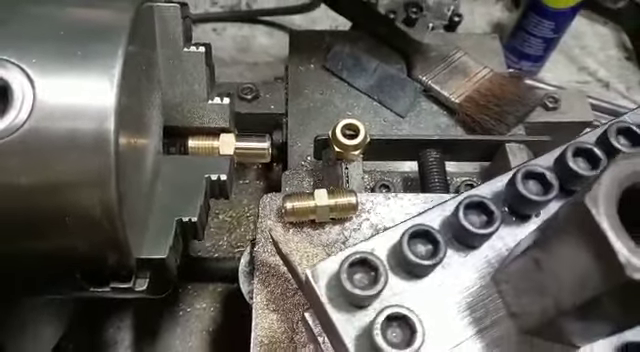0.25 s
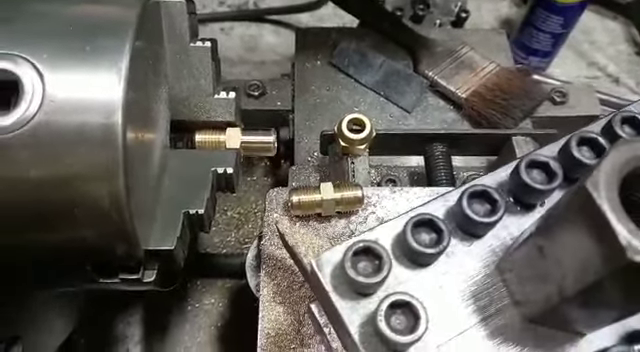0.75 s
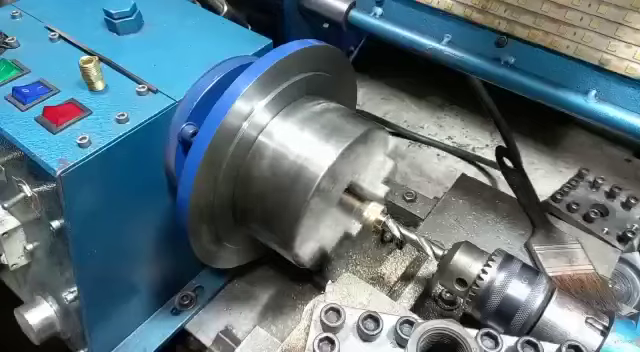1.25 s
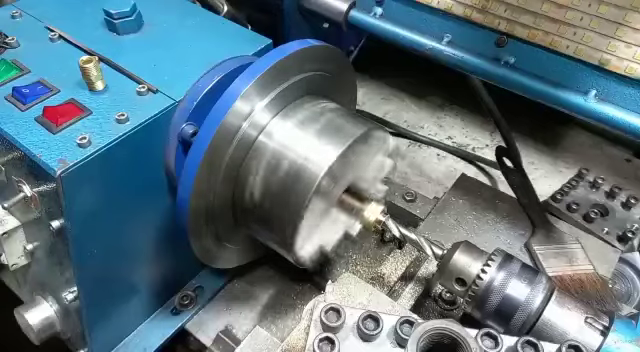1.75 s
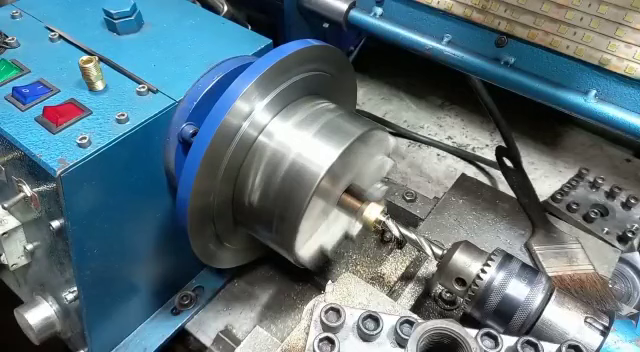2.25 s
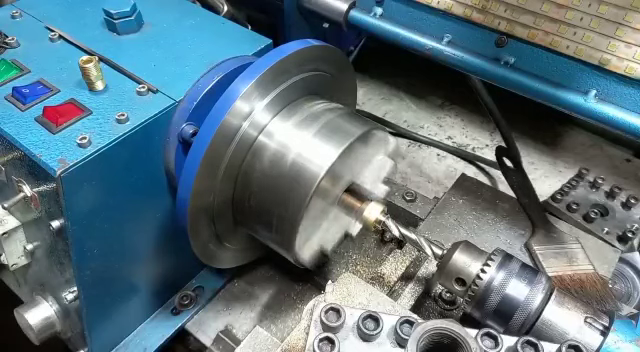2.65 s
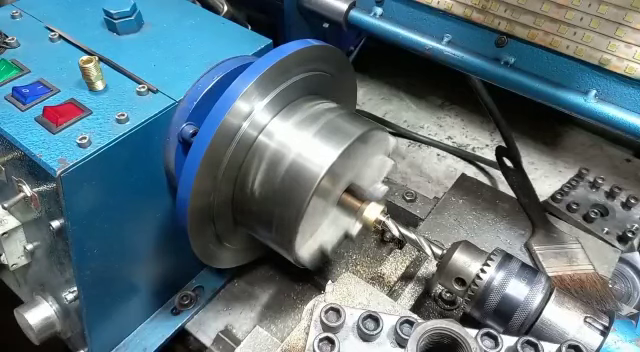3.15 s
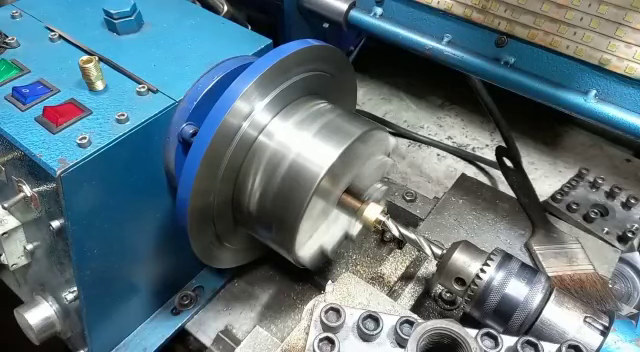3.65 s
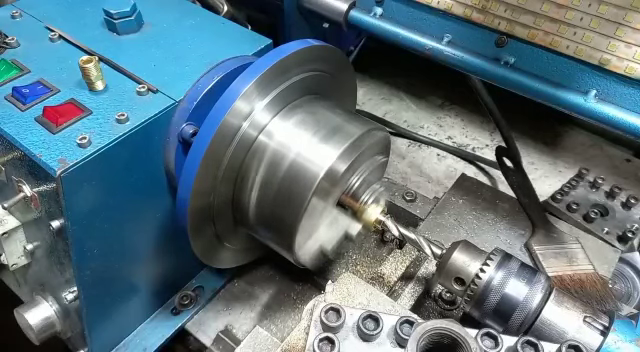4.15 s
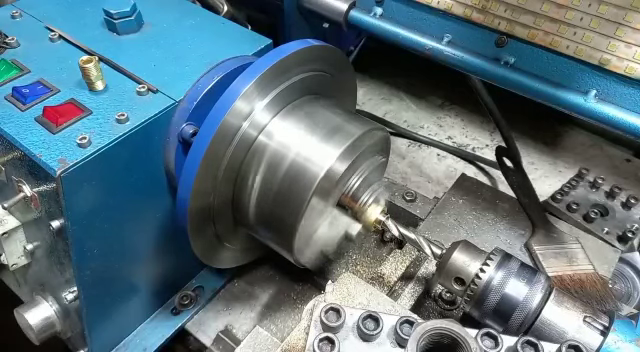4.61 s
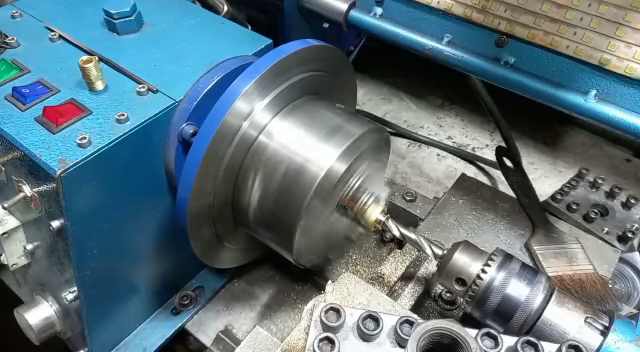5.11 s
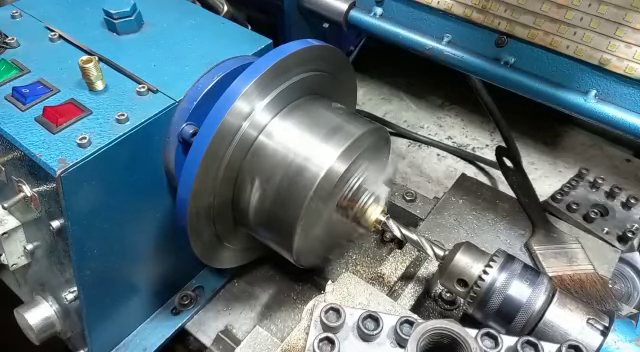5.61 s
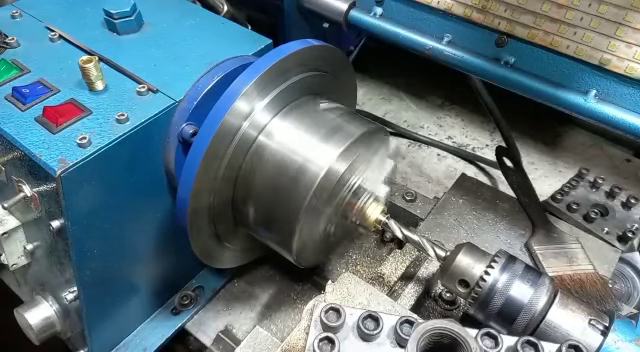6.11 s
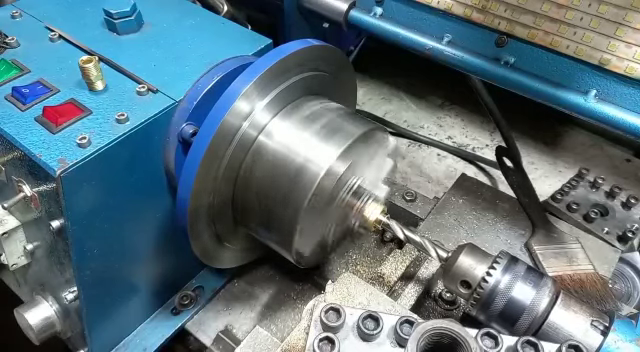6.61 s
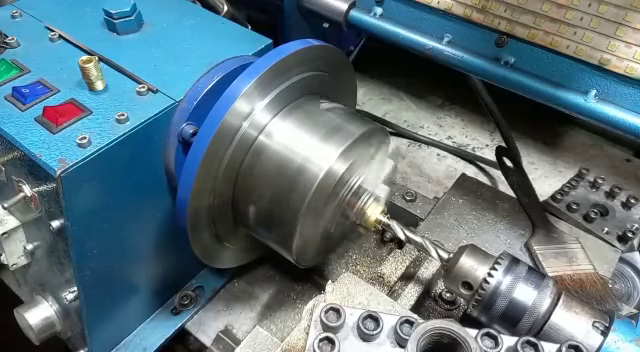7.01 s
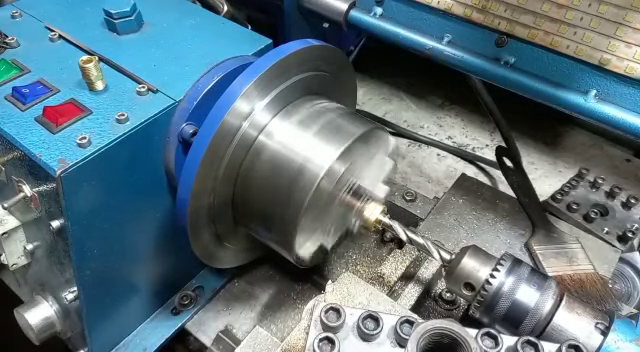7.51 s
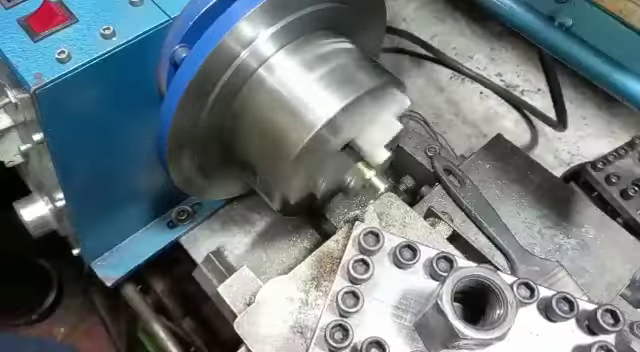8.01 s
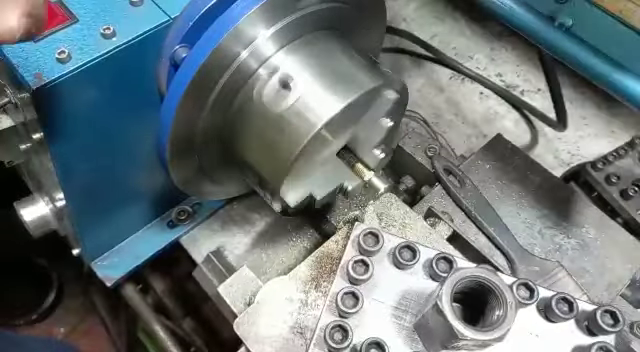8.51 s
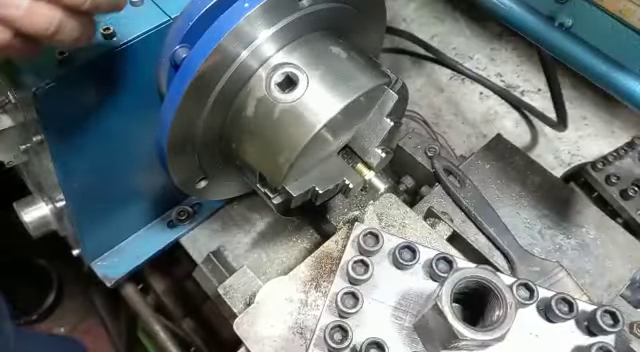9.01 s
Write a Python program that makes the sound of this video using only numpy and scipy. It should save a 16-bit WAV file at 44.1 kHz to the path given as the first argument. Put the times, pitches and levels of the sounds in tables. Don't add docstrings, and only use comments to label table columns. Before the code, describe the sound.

A quiet workshop with humming fan, faint room hiss, a small switch click and a dull far knock. After a tiny gap, close stereo microphones catch a drill boring spinning brass: rough, high metallic chatter, pulsing chip hiss and bright pings. It locks into a broken squeal, then loosens into soft rubbing with air thumps, mostly on the right. Finally the spindle whirs down, with thin brake squeaks and lever clicks.

```python
import sys
import numpy as np
from scipy import signal
from scipy.fft import rfft, irfft, next_fast_len
from scipy.io import wavfile
from scipy.ndimage import uniform_filter1d, map_coordinates

SR = 44100
rng = np.random.default_rng(int(sys.argv[2]) if len(sys.argv) > 2 else 0)


def int16_out(signal):
    q = np.round(np.clip(np.atleast_2d(signal).T, -1, 1) * 32767)
    wavfile.write(sys.argv[1], SR, q.astype(np.int16))


def invert_db(x):
    u = np.asarray(x, float) / 20
    return 10 ** u


N = 408321
TIME = np.arange(N) / SR
HALF = np.array([[.5], [-.5]])

# (from [s], to [s], fade-in [s])
SHOTS = [
    (0, 1.012, .001),
    (1.0905, 7.727, .006),
    (7.727, 9.3, .02),
]
IDLE_END_S = SHOTS[0][1]
CUT_S, CUT_END_S = SHOTS[1][:2]
COAST_S, END_S = SHOTS[2][:2]
TURNS_HZ = 10.72
LOCKED_S, FREE_S = 4.36, 4.5
STOP_S = 8.5


def unit(x):
    return x / np.sqrt(np.mean(np.abs(x) ** 2) + 1e-20)


def along(points, hz):
    f, v = np.transpose(points)
    return np.interp(np.log(hz + 1), np.log(f + 1), v)


def curves(rows):
    s, *cols = np.transpose(rows)
    inside = (TIME >= s[0]) & (TIME <= s[-1])
    gate = uniform_filter1d(inside * 1., size=400)
    return [np.interp(TIME, s, c) for c in cols] + [gate]


def since(s):
    return np.maximum(TIME - s, 0)


def during(a, b, edge=0.013):
    return np.clip((TIME - a) / edge + .5, 0, 1) * np.clip((b - TIME) / edge + .5, 0, 1)


def dip(s, half_s):
    return np.exp(-((TIME - s) / half_s) ** 2)


def burst(s, attack, t60):
    out, t = np.zeros(N + SR), np.arange(SR // 2) / SR
    out[round(s * SR):][:len(t)] = (1 - np.exp(-t / attack)) * invert_db(-60 * t / t60)
    return out[:N]


def wobble(rate):
    coarse = TIME[::8]
    knots = rng.standard_normal(int(N * rate / SR) + 4)
    return np.interp(TIME, coarse, map_coordinates(knots, [coarse * rate]))


def flutter(rate):
    return wobble(rate) + 1j * wobble(rate)


def tone(hz):
    return np.exp(2j * np.pi * hz * TIME)


def filtered(x, response):
    m = next_fast_len(N + SR // 2)
    return irfft(rfft(x, m) * response(np.fft.rfftfreq(m, 1 / SR)), m)[..., :N]


def ports(z, lead, pan_db):
    return np.real(z * invert_db(HALF * pan_db) * np.exp(-1j * lead * HALF))


def rush(force, mid, side, side_db):
    m, s = filtered(force, lambda hz: invert_db([along(mid, hz), along(side, hz) + side_db]))
    return unit(np.array([m + s, m - s]))


def ringing(force, modes, diffuse):
    def response(f):
        total = 0
        for hz, width, db, lead, pan in modes:
            resonance = 1j * f * width / (hz * hz - f * f + 1j * f * width)
            total = total + invert_db(db + HALF * pan) * np.exp(-1j * lead * HALF) * resonance
        return total
    return filtered(force[0] + diffuse * force[1:], response)


def grit(count, spiky_db, patchy_db=2.0):
    z = signal.stft(rng.standard_normal((count, N)), nperseg=512)[2]
    field = uniform_filter1d(rng.standard_normal(z.shape[1:]), size=2, axis=0)
    field = uniform_filter1d(field, size=5, axis=1)
    patchy = signal.istft(z * invert_db(patchy_db * unit(field)), nperseg=512)[1][:, :N]
    return unit(patchy * invert_db(spiky_db * wobble(900) + 0.8 * wobble(30)))


# (frequency [Hz], level [dB])
AIR_MID = [(18, -69), (30, -17), (137, -16.5), (165, -19), (250, -4.5), (285, -10), (361, -12),
           (412, -13.5), (610, -22.5), (1650, -23.5), (1980, -20), (3010, -26), (6280, -31.5), (7540, -45),
           (15700, -56)]
AIR_SIDE = [(18, -78), (30, -45), (294, -11), (354, -13), (910, -17), (1150, -10), (1540, -15),
            (2670, -11.5), (3960, -22), (5710, -19.5), (15900, -55)]
# (frequency [Hz], width [Hz], level [dB], right lead [rad], L-R [dB])
FITTINGS = [(177.6, 8.9, 11.5, -0.36, 5), (513, 34, 8, -0.88, -3), (722, 61, 3, -1.2, -5),
            (2040, 41, 7, -0.8, -1), (2280, 60, 2, 1, 0), (2413, 23, 5, 0.9, 0), (6320, 230, 0, 0.46, -1)]
# (time [s], frequency [Hz], level [dB], t60 [s])
KNOCK = [
    (0.58, 366, -32.5, 0.13),
]


def shop():
    idle_db, idle_hum_db = -55, -49
    late_db, late_db_per_s, late_hum_db = -54.5, 4, -54
    force = rng.standard_normal((5, N))
    buzz = unit(ringing(force[2:], FITTINGS, diffuse=0.67))
    buzz = filtered(buzz, lambda f: 1 / (1 + (f / 7200) ** 3))
    air = rush(force[:2], AIR_MID, AIR_SIDE, side_db=-7.0) + 0.6 * buzz
    hum = ports(unit(1.9 + flutter(16)) * tone(258), -.2, 0)
    late = TIME > COAST_S
    fall_db = late_db_per_s * since(COAST_S)
    room_db = np.where(late, late_db - fall_db, idle_db)
    hum_db = np.where(late, late_hum_db - fall_db, idle_hum_db)
    heard = late | (TIME < IDLE_END_S)
    out = heard * (invert_db(room_db + 9) * air + invert_db(hum_db + 2.5) * hum)
    for s, hz, db, t60 in KNOCK:
        out = out + invert_db(db + 11.5) * burst(s, 0.024, t60) * np.sin(2 * np.pi * hz * TIME)
    return out


# (frequency [Hz], level [dB])
GEARS = [
    [(35, -39), (60, -13), (183, -5.5), (227, -12.5), (518, 3), (845, -11.5), (1200, -9), (1560, -5.5), (2640, -120)],
    [(35, -41), (60, -3), (207, -28), (249, -14), (379, -8.5), (491, -1.5), (820, -11.5), (3250, -22), (3920, -29), (4950, -20.5), (8870, -37.5), (10200, -31.5), (15900, -48)],
]
# (frequency [Hz], width [Hz], level [dB], right lead [rad], L-R [dB])
GEARBOX = [
    [(90.6, 23.6, 12.5, -0.5, -1.7), (181.6, 23.5, 7.5, -0.3, -0.55), (250, 11.3, 9, 0.3, 0.23), (328.5, 13, 3, -1.2, -0.12), (492.4, 8.8, 12.5, -0.9, -0.33), (520, 39, -10, 3.5, -0.34), (574, 5.5, 5.5, 2, 0), (530, 11, 1.5, .3, 0), (1343, 105, 8, -2.5, 0.46)],
    [(259, 4.2, -10, 0.46, 0), (496, 12, 11.5, 0.75, 0), (1030, 54, -1, 1.3, 0), (1305, 22, 5, 2.34, 0)],
]


def drive():
    motor_db, load_db = -45.5, 2.5
    coast_db, coast_db_per_s, stopped_db = -41, 16, -57.5
    running = invert_db(motor_db + load_db * during(0, LOCKED_S, edge=0.48)) * during(CUT_S, CUT_END_S)
    uneven_db = 1.7 * wobble(28) + 1.7 * wobble(150)
    coasting = invert_db(coast_db - coast_db_per_s * since(COAST_S) + uneven_db) * during(0, STOP_S, edge=0.08)
    slowing = (coasting + invert_db(stopped_db)) * during(COAST_S, END_S)
    out = 0
    for level, gears, modes in zip([running, slowing], GEARS, GEARBOX):
        force = rng.standard_normal((5, N)) * invert_db(0.89 * wobble(12))
        casting = unit(ringing(force[2:], modes, diffuse=0.091))
        whirr = rush(force[:2], gears, gears, side_db=-10.5) + 0.98 * casting
        out = out + invert_db(2.0) * level * whirr
    return out


def whine():
    level_db, upper_db, upper_share = -57, -68, .75
    rise_s, hold_s, db_per_s = 0.083, 8.33, 34
    fade_db = db_per_s * since(hold_s)
    rise = np.clip(since(COAST_S) / rise_s, 0, 1)
    low = unit(2.3 + flutter(70)) * tone(10002) * invert_db(level_db - fade_db + 7.0)
    upper = unit(.4 + flutter(500)) * tone(15060) * invert_db(upper_db - upper_share * fade_db + 9)
    return rise * (ports(low, -1.4, -1.8) + ports(upper, -1.9, 0))


# (time [s], length [s], level [dB])
BRAKE = [(8.26, .05, -68), (8.33, 0.032, -64), (8.398, 0.04, -55), (8.44, 0.041, -55), (8.483, 0.038, -58),
         (8.52, .03, -66), (8.68, .02, -70), (8.735, .028, -67), (8.775, .055, -68), (8.918, .095, -72),
         (9.09, .03, -71)]


def brake():
    brake_hz, released_hz, release_s = 4860, 5005, 8.6
    wander = np.cumsum(12 * wobble(40)) / SR
    swing = 1 + .5 * flutter(110)
    rattle = invert_db(-16) * flutter(250)
    out = 0
    for s, length, db in BRAKE:
        hz = brake_hz if s < release_s else released_hz
        phase = 2 * np.pi * (hz * TIME + wander)
        squeak = swing * np.exp(1j * phase) + rattle * np.exp(2.457j * phase)
        out = out + ports(during(s, s + length, edge=.01) * invert_db(db + 10.0) * squeak, 1.4, 0.92)
    return out


# (frequency [Hz], width [Hz], level [dB], right lead [rad], L-R [dB])
SWITCH = [(1900, 1200, -5, 1, 0), (3470, 720, 1, 0.86, 0), (4850, 1200, -5, 1.5, 0), (6540, 410, 7, 3, -1),
          (9100, 1500, -18, 1, 0), (12600, 500, -6, -4, -2)]
# (time [s], peak [dB], t60 [s], body [dB])
CLICKS = [(0.1745, -52, 0.088, -2), (8.5495, -55, 0.1, 0), (8.445, -56, .03, 12), (8.718, -50, 0.034, 14),
          (8.724, -50, 0.045, 13), (9.0877, -61.5, 0.046, 16)]


def clicks():
    snap = unit(ringing(grit(count=3, spiky_db=3, patchy_db=1.5), SWITCH, diffuse=.6))
    tick = filtered(snap, lambda f: 1 / (1 + (7500 / (f + 1)) ** 6))
    out = 0
    for s, db, t60, body_db in CLICKS:
        out = out + invert_db(db) * burst(s, 0.0037, t60) * (3 * tick + invert_db(body_db + 9.0) * (snap - tick))
    return out


# (frequency [Hz], level [dB], t60 [s])
LATCH = [(3570, 6, 0.054), (4450, -9, .03), (5050, -9, .04), (6840, 3, .05), (7660, -10, .06),
         (11500, -16, .05), (12500, -8, .16)]


def latch():
    snap_s, snap_db = 8.724, -41
    out = 0
    for hz, db, t60 in LATCH:
        ring = invert_db(snap_db + db) * burst(snap_s, .004, t60) * unit(.8 + flutter(150)) * tone(hz)
        out = out + ports(ring, 1, 0)
    return out


# (frequency [Hz], level [dB])
BUFFET = [(12, -51), (20, -16), (80, 0), (193, -14.5), (261, -16), (340, -30), (400, -18), (520, -66),
          (880, -120)]
# (time [s], peak [dB], L-R [dB])
THUMPS = [(1.561, -31, -17), (3.073, -25, -15), (6.04, -33, -22), (6.158, -29.5, -20), (6.449, -35, -3),
          (6.868, -37.5, -16.5), (6.909, -33, -5), (7.303, -35, -27), (7.361, -31.5, -25), (7.877, -30, 1),
          (8.4, -38, -7), (8.612, -31, 5), (8.854, -37, 12), (8.898, -44, 5)]


def draught():
    breeze_db, breeze_lr_db = -65, -8
    gust_db, gust_s = -28, .18
    thump_hz, thump_t60_s = 85.3, 0.16
    lumps = rng.standard_normal((2, N)) * invert_db(3.6 * np.array([wobble(46), wobble(20)]))
    buffet = unit(filtered(lumps, lambda hz: invert_db(along(BUFFET, hz))))
    breeze = invert_db(breeze_db + HALF * breeze_lr_db + 1.8 * wobble(2.67))
    out = buffet * breeze * during(CUT_S, STOP_S, edge=.1)
    drift = np.cumsum(13 * np.array([wobble(40), wobble(40)]), axis=1) / SR
    for s, peak_db, lr_db in THUMPS:
        span = slice(round((s - .3) * SR), round((s + 0.41) * SR))
        t = TIME[span] - s
        turns = thump_hz * t + drift[:, span] - drift[:, [round(s * SR)]]
        push = np.sin(2 * np.pi * turns) + .5 * buffet[:, span]
        gust = invert_db(gust_db) * np.exp(-(t / gust_s) ** 2) * buffet[:, span]
        thump = burst(s, 0.0052, thump_t60_s)[span] * push
        out[:, span] += invert_db(peak_db + 1.5 + HALF * lr_db) * (thump + gust)
    return filtered(out, lambda f: 1 / (1 + (45 / (f + 1)) ** 4))


# (time [s], peak [dB])
PINGS = [(1.0958, -32), (1.1801, -29), (1.257, -33), (1.3074, -24), (1.3642, -28), (1.4406, -32),
         (1.5638, -27), (1.6451, -25), (1.7543, -28), (1.8656, -23), (1.9419, -31), (2.0187, -27),
         (2.1075, -27), (2.2353, -18), (2.2966, -24), (2.4253, -17.5), (2.5201, -16), (2.6149, -26),
         (2.7047, -31), (2.7775, -24), (2.8962, -23), (2.9631, -35), (3.0265, -27), (3.0813, -27),
         (3.1876, -34), (3.2699, -27), (3.3577, -18), (3.4764, -29), (3.5398, -19), (3.6401, -17),
         (3.7363, -30), (3.8201, -21), (3.9159, -20), (3.9733, -27), (4.0611, -37), (4.1953, -37),
         (4.2891, -26)]


def pings():
    edge = sum(invert_db(db + 5.5) * burst(s, 0.0052, t60=0.064) for s, db in PINGS)
    return ports(edge * unit(1.7 + flutter(120)) * tone(9560), -.9, -2)


# (frequency [Hz], width [Hz], level [dB], right lead [rad], L-R [dB])
RUBBING = [(1327, 20, -8, 0.91, 0), (1450, 21, 0.5, 2.34, -6), (1470, 16, 5, 1.83, -5),
           (1512, 20, 3, 2.06, -3.5), (1540, 18, -1.5, 1.8, -8), (1700, 35, -14, 0.95, -5)]
# (time [s], extra level [dB])
GRABS = [(5.31, 6), (5.575, 13), (5.69, 11), (5.84, 13), (5.99, 3), (6.143, 19), (6.231, 15.5), (6.262, 10),
         (6.39, 5), (6.51, 10), (6.72, 7), (6.81, 7), (6.9, 3), (7.0, 6), (7.09, 10.5), (7.17, 11.5),
         (7.26, 7), (7.31, -3), (7.42, -12), (7.535, -8), (7.68, -6)]
RUB_SWING_DB = -41


def rubbing():
    grabs = 1 + sum(invert_db(extra_db) * burst(s, .004, t60=0.1) for s, extra_db in GRABS)
    murmur = 0
    for hz, width, db, lead, pan_db in RUBBING:
        murmur = murmur + ports((.3 + flutter(1.7 * width)) * invert_db(db) * tone(hz), lead, pan_db)
    return unit(murmur) * invert_db(RUB_SWING_DB - 1.5) * grabs * during(FREE_S, CUT_END_S)


# (frequency [Hz], width [Hz], depth [dB])
NOTCHES = [(1395, 55, 17), (2080, 50, 5.5), (2810, 41, 2), (3575, 61, 2), (4410, 28, 4), (7380, 46, 13),
           (8660, 146, 14), (9843, 136, 17), (10340, 100, 12), (13700, 250, 7)]


def cancel(pair):
    def cut(f):
        return invert_db(-sum(db * np.exp(-((f - hz) / w) ** 2) for hz, w, db in NOTCHES))
    side = (pair[0] - pair[1]) / 2
    return filtered((pair[0] + pair[1]) / 2, cut) + [side, -side]


def walls(pair, ripple_db):
    knots = rng.standard_normal((2, 400))
    knot_hz = 45 * np.arange(400)
    return filtered(pair, lambda f: invert_db(ripple_db * np.array([np.interp(f, knot_hz, k) for k in knots])))


# (frequency [Hz], level [dB])
CUT_MID = [(380, -49), (650, -40.5), (1220, -28.5), (1390, -12), (1570, -8.5), (2070, -26), (3010, -25.5),
           (3580, -27), (4370, -21), (5340, -26), (7350, -19), (8510, -26.5), (9340, -21), (10300, -31.5),
           (15700, -34)]
CUT_SIDE = [(380, -57), (650, -46), (1370, -22.5), (1550, 0.5), (1740, -12.5), (3090, -18), (3630, -22),
            (5480, -19.5), (7440, -39), (8280, -37), (9340, -19), (10100, -25), (15700, -36)]
# (frequency [Hz], width [Hz], level [dB], right lead [rad], L-R [dB])
BODY = [(781, 23, 3.5, 0.5, -4), (955, 116, 2, 1.5, 2), (1314, 7, 1.5, 2, 19), (2646, 106, 4.5, -2, -8),
        (1920, 37, 15, 3.5, -7), (2273, 126, 7, -1.5, 4), (2543, 54, 5.5, -2, -10), (2934, 206, 5, -1, -10),
        (4357, 71, 6, 1.8, -11), (5950, 280, 5.5, -5, 2.5), (7320, 53, 6, 11.5, 6),
        (7436, 120, 12.5, 3, -9), (8730, 62, 0, 8.5, -25.5), (11540, 69, -1, 0, -9),
        (11990, 48, 4.5, 3.5, 5), (13070, 94, 0, -2.5, -8), (10670, 68, 2.5, 2.5, 9),
        (14100, 160, -7, 2, -5), (14960, 220, -4, 2.5, 4)]
TOOL = [(8980, 84, 2, 4.5, 1), (9327, 71, 2, 3, 8), (9660, 86, 4.5, -1.5, -7), (10240, 100, -12, 12.5, 17)]
# (time [s], peak [dB])
CATCH = [(4.701, -13), (4.884, -29), (4.897, -19.5), (4.9875, -24.5), (5.0749, -32), (5.1667, -23),
         (5.1837, -27)]
# (time [s], pressure [dB])
RUB = [(4.4, -0.5), (5.3, 0.5), (5.7, 0), (6.25, 1), (6.6, -0.5), (6.75, 0), (7.1, -0.5), (7.35, 2),
       (7.73, 0.5)]
# (time [s], chip load [dB], drill swing [dB])
FEED = [(1.09, -25.5, -25), (1.2, -26, -23), (1.3, -27.5, -24.5), (1.53, -24.5, -23), (1.68, -28, -26),
        (2.05, -27.5, -23), (2.28, -33.5, -21.5), (2.6, -30.5, -21.5), (2.8, -27.5, -20.5),
        (2.97, -30, -21), (3.1, -28, -20.5), (3.28, -28, -19), (3.37, -30.5, -22.5), (3.6, -28.5, -20),
        (3.97, -28, -25), (4.08, -25, -22), (4.2, -22, -20), (4.26, -26.5, -27.5)]


def chips():
    back_off_db_per_s = 111
    rub_chips_db, tool_db, rub_tool_db = -46, -13.5, -5
    scrape_db, scrape_t60_s = -29.5, 0.28
    load_db, swing_db, _ = curves(FEED)
    off_db = back_off_db_per_s * since(FEED[-1][0])
    turn = 2 * np.pi * TURNS_HZ * TIME

    scrape = sum(invert_db(db + scrape_db) * burst(s, 0.024, scrape_t60_s) for s, db in CATCH)
    rub = invert_db(rub_chips_db + curves(RUB)[0] + 0.15 * wobble(5))
    cut = invert_db(load_db - off_db) + rub + scrape
    ring = invert_db(swing_db + tool_db - off_db) + rub * invert_db(rub_tool_db)
    pulse = invert_db(0.37 * np.cos(turn + 2.0) + 0.7 * wobble(8)) * during(CUT_S, CUT_END_S)

    force = grit(count=5, spiky_db=1.34)
    body = unit(ringing(force[2:], BODY, diffuse=0.63))
    body_level = invert_db(1.5 - 0.63 * during(LOCKED_S, CUT_END_S))
    hiss = 1.52 * rush(force[:2], CUT_MID, CUT_SIDE, side_db=-4.0) + body_level * body
    tool = unit(ringing(grit(count=3, spiky_db=4.0), TOOL, diffuse=0.17))
    tool = tool * invert_db(5.5 + 0.57 * np.cos(turn + 0.33))

    catch = sum(invert_db(db) * burst(s, 0.004, 0.043) for s, db in CATCH)
    rasp = filtered(catch * 0.44 * hiss, lambda f: 1 / (1 + (5200 / (f + 1)) ** 4))
    chirp = 0
    for multiple, db in [(1, 5.5), (3, -9), (4, -1.5), (5.9, -2), (8, -7)]:
        chirp = chirp + invert_db(db) * (0.95 + 0.2 * flutter(300)) * tone(multiple * 1565)
    near = walls(pulse * (cut * hiss + ring * tool) + rasp, ripple_db=2.5)
    return cancel(near) + ports(catch * 0.84 * chirp, 0.6, 0)


BENDING_HZ = [1486, 1505, 1540, 1567, 1610, 1640, 1712]
# (width [Hz], level [dB], right lead [rad], L-R [dB])
BENDING = [(18.32, 4, 4, -9.5), (20.09, 4, 1.96, -5), (25.53, 1, 1.55, 2), (17.95, 2.5, 0.74, 5.5),
           (25.1, -5.5, 1.34, -0.5), (25.37, -1.5, 0.68, 6), (34.9, 2.5, 0.76, -24.5)]


def chatter():
    loaded_hz, hz_per_load_db = 1617.7, 7.5
    sag_hz_per_s, rub_hz = 11.3, 1506
    turn = 2 * np.pi * TURNS_HZ * TIME
    sweep = signal.sawtooth(turn - 2.6, .45)
    load_db, swing_db, _ = curves(FEED)
    cutting_hz = loaded_hz + hz_per_load_db * (load_db + 27.0) - sag_hz_per_s * since(CUT_S)
    hz = np.where(TIME < LOCKED_S, cutting_hz, rub_hz)
    level = invert_db(0.77 * np.cos(turn - 3.6) + 0.51 * wobble(7.1) + swing_db) * during(CUT_S, LOCKED_S)
    centre = hz + 30 * sweep + 12 * wobble(25)
    out = 0
    for mode_hz, (width_hz, mode_db, lead, pan_db) in zip(BENDING_HZ, BENDING):
        near = invert_db(mode_db) * (0.057 + np.exp(-((mode_hz - centre) / 55) ** 2))
        out = out + ports(near * (0.5 + flutter(1.5 * width_hz)) * tone(mode_hz), lead, pan_db)
    swing = np.sqrt(np.abs(uniform_filter1d(np.mean(out ** 2, axis=0), size=1500)) + 1e-9)
    return unit(out / swing ** 0.9) * level * invert_db(1.5)


# (time [s], pitch [Hz], level [dB])
SQUEAL = [(4.24, 1505, -36), (4.31, 1493, -29), (4.4, 1505, -24), (4.7, 1503, -23.5), (4.75, 1470, -29),
          (4.86, 1492, -23.5), (5.07, 1472, -31.5), (5.255, 1483, -36), (5.29, 1505, -59)]
# (multiple, level [dB])
OVERTONES = [(1, 5), (2, -16.5), (3, -22.5), (4, -27), (5, -22), (6, -22.5), (7, -32.5), (8, -30), (9, -38),
             (10, -38)]
# (right lead [rad], L-R [dB])
SIDES = [(2, 4), (-1.6, -3), (2, -1), (1.5, 0), (2, -1), (4, -1), (0, 5), (-1, 0), (2, 0), (0, -7)]
# (time [s], dip [dB], half length [s])
SLIPS = [(4.332, 13, .008), (4.386, 3.5, 0.011), (4.473, 3.5, .015), (4.547, 2.5, .015), (4.597, 2.5, .012),
         (4.637, 1.5, .01), (4.72, 11, 0.0062), (4.742, 6, .005), (4.78, 10.5, .012), (4.815, 9, 0.021),
         (4.888, 8, .014), (4.984, 12.5, .012), (5.044, 16, 0.015), (5.094, 12, .008), (5.131, 15, 0.027),
         (5.19, 14, .01), (5.232, 10.5, .01)]
# (time [s], overtone level [dB])
BITES = [(4.35, -6), (4.405, 2), (4.48, 1), (4.53, 3), (4.57, -1), (4.6, 0), (4.63, 2), (4.658, 1),
         (4.69, -5), (4.72, 1), (4.76, 0), (4.825, -2), (4.886, 0.5), (4.925, -6), (4.99, -8),
         (5.012, -5.5), (5.066, -14), (5.142, -15), (5.172, -13), (5.214, -14), (5.232, -18)]


def squeal():
    bite_s, blunt_db = 0.021, -23
    hz, db, gate = curves(SQUEAL)
    db = db - sum(dip_db * dip(s, half_s) for s, dip_db, half_s in SLIPS)
    bites = sum(invert_db(bite) * dip(s, bite_s) for s, bite in BITES)
    bite_db = 20 * np.log10(invert_db(blunt_db) + bites)
    phase = 2 * np.pi * np.cumsum(hz + 4 * wobble(70)) / SR
    out = 0
    for (k, level_db), (lead, pan_db) in zip(OVERTONES, SIDES):
        rough = .05 if k == 1 else 0.7 + 0.066 * k
        swing = 1 + rough * flutter(130 if k < 3 else 280)
        swing = swing * invert_db(1.1 * rough * wobble(30)) / np.sqrt(1 + 2 * rough ** 2)
        fading_db = db if k == 1 else (0.37 + 1.14 / k) * bite_db - 22
        out = out + ports(swing * invert_db(level_db + fading_db + 7.5) * np.exp(1j * k * phase), lead, pan_db)
    return out * gate


def scene():
    background = shop() + drive() + whine() + brake() + clicks() + latch() + draught()
    return background + pings() + rubbing() + chips() + chatter() + squeal()


def top_cut(x):
    return signal.sosfilt(signal.butter(12, 16830, fs=SR, output="sos"), x)


# (time [s], gain [dB])
GAIN = [(5.15, -0.5), (5.4, 0.5), (6.2, 3), (7.0, 10.5), (7.35, 9.5), (7.73, 8.5)]


def record(dry):
    shots = sum(np.clip((TIME - a) / fade, 0, 1) * (TIME < b) for a, b, fade in SHOTS)
    gain = invert_db(curves(GAIN)[0] * (TIME < COAST_S))
    mix = filtered(dry * shots * gain, lambda hz: hz < 15760)
    return top_cut(mix)


dry = scene()
out = record(dry)
int16_out(out)
```